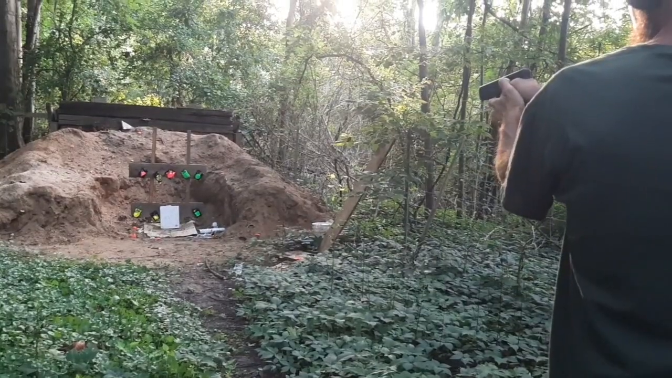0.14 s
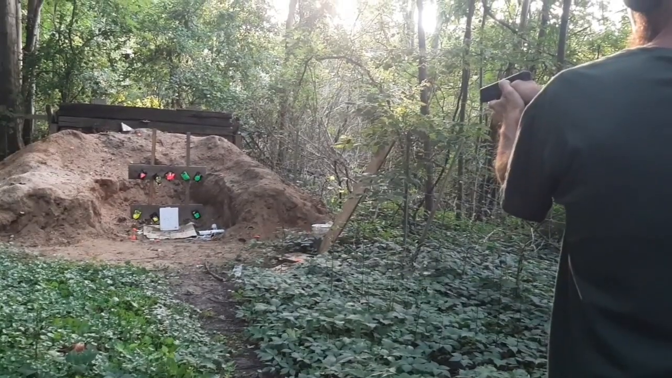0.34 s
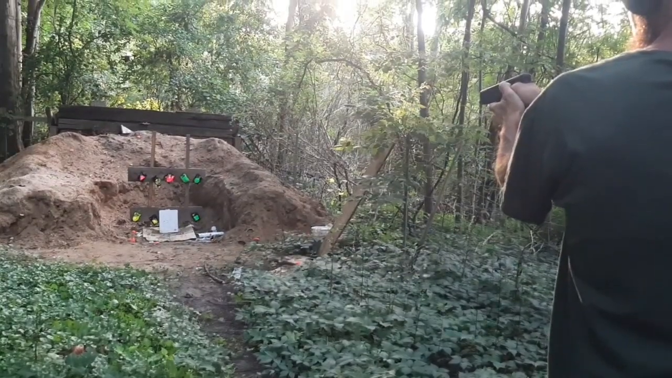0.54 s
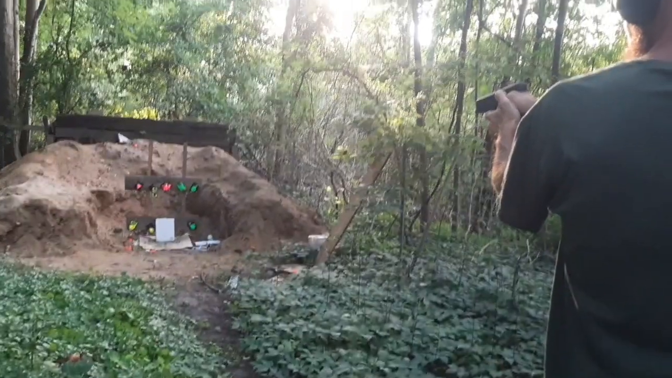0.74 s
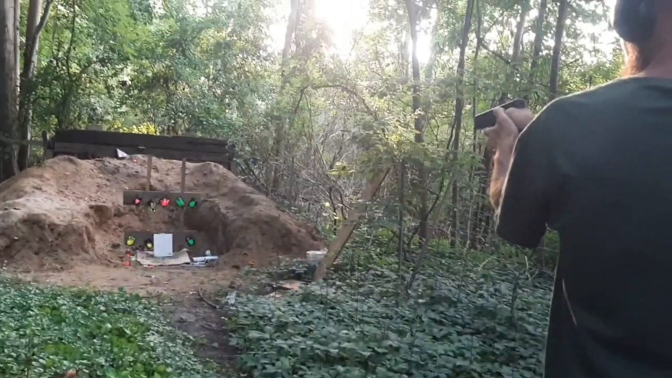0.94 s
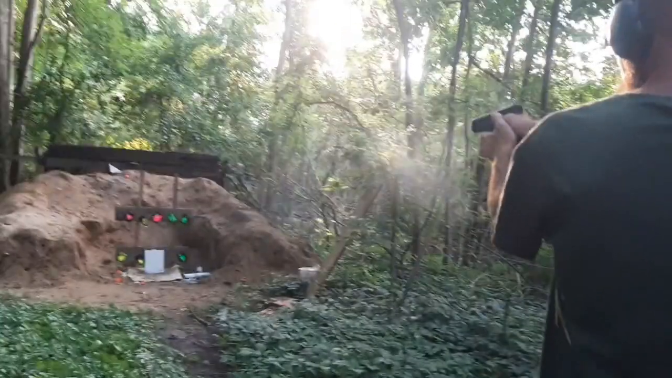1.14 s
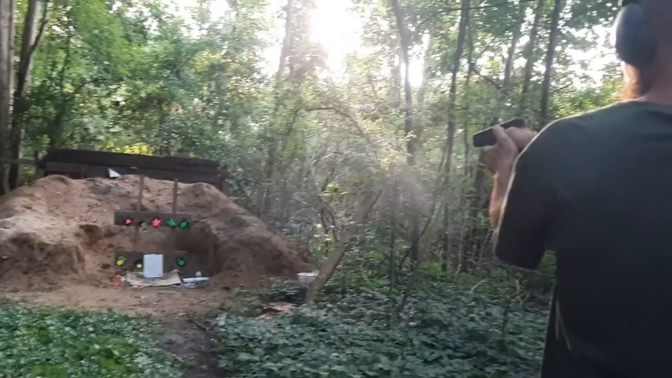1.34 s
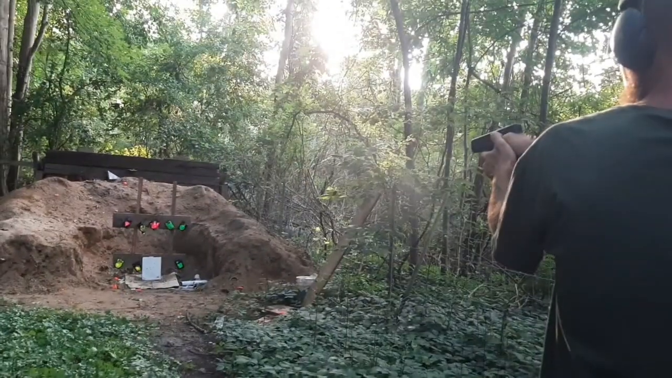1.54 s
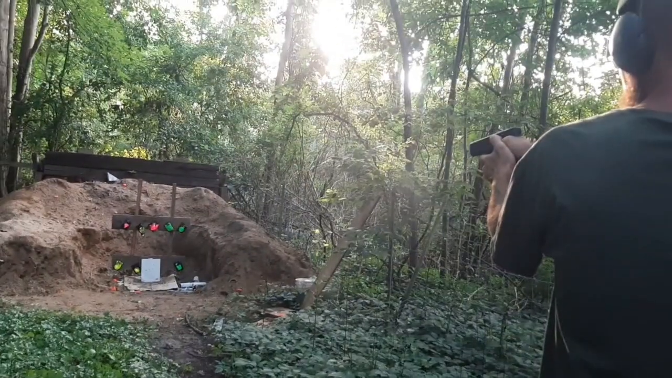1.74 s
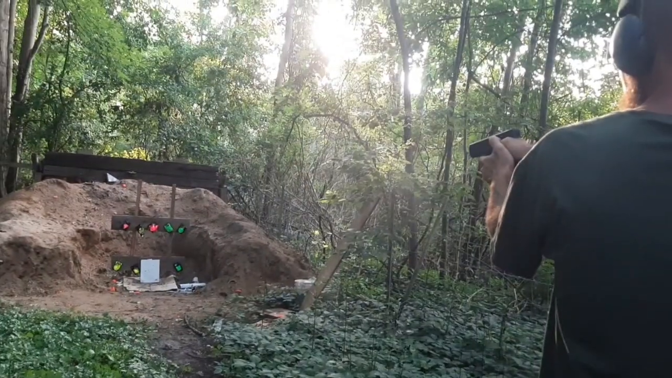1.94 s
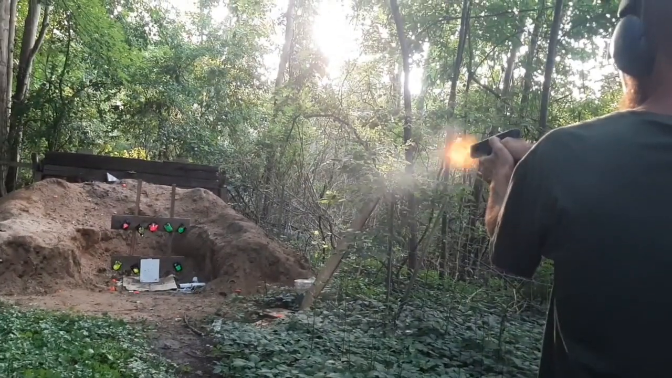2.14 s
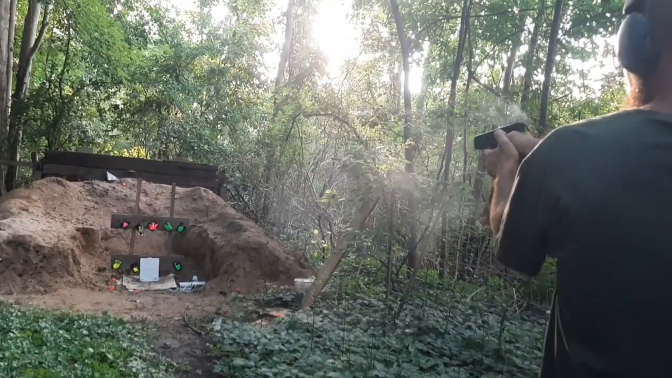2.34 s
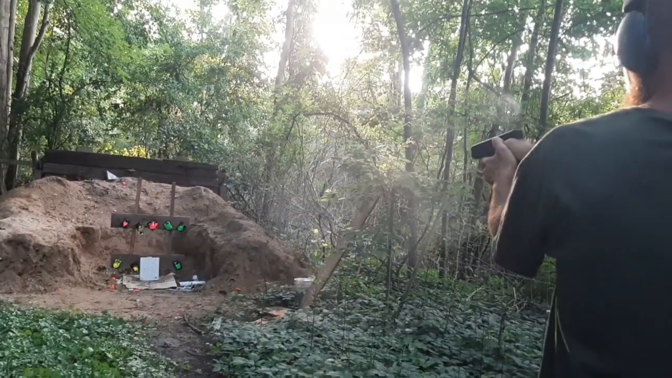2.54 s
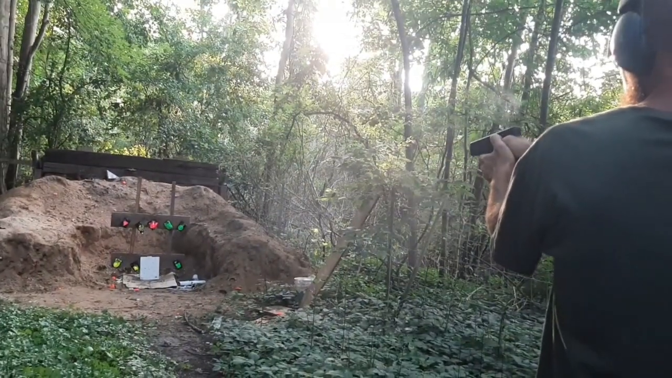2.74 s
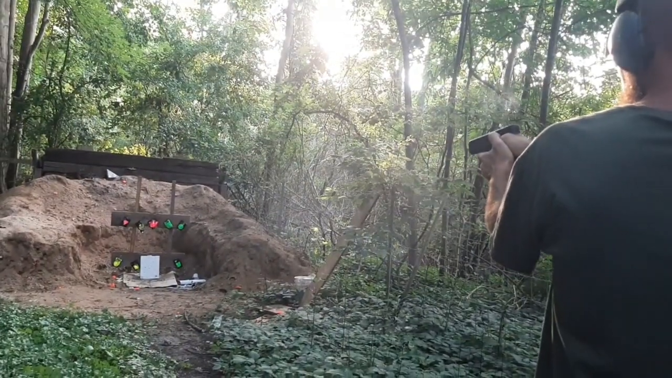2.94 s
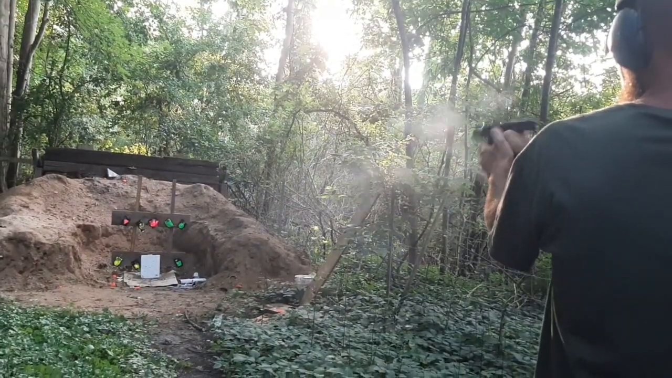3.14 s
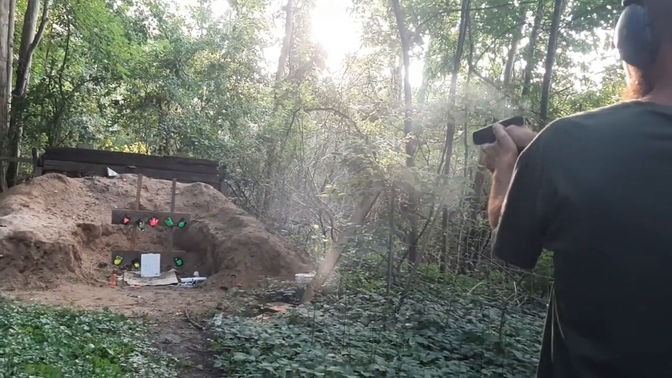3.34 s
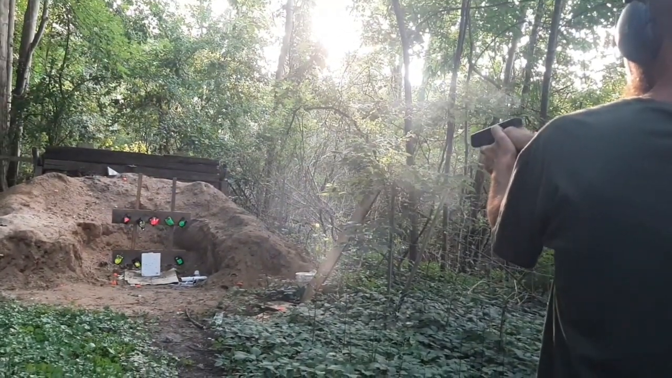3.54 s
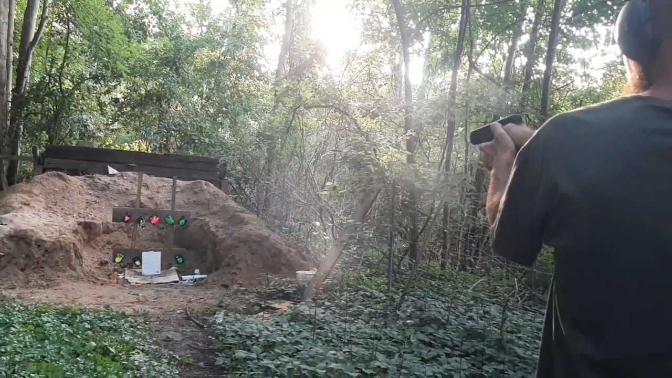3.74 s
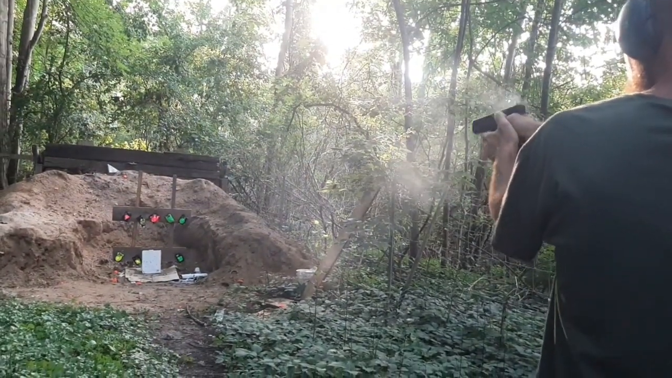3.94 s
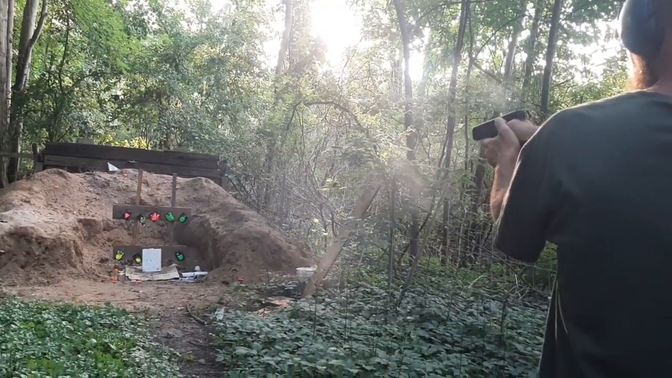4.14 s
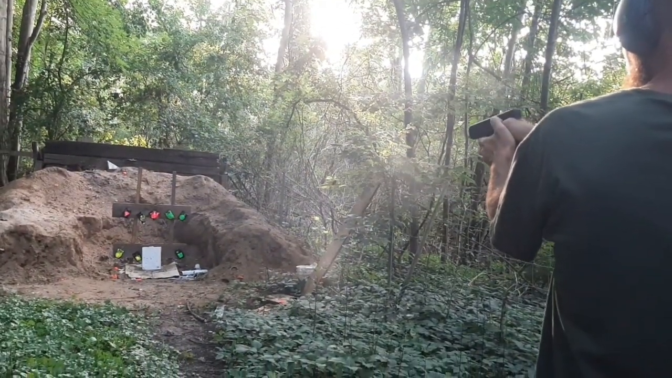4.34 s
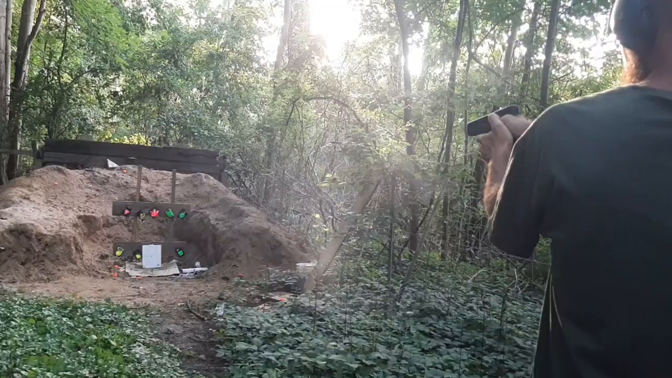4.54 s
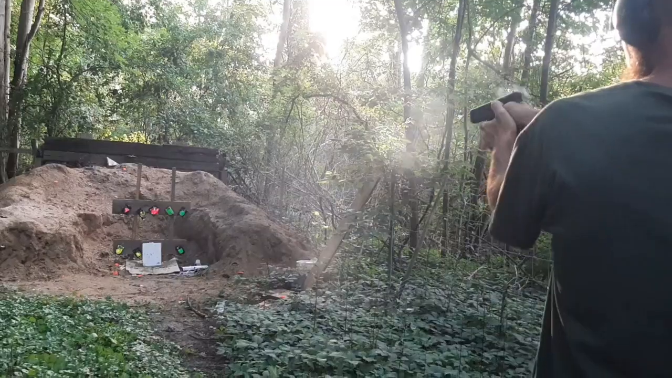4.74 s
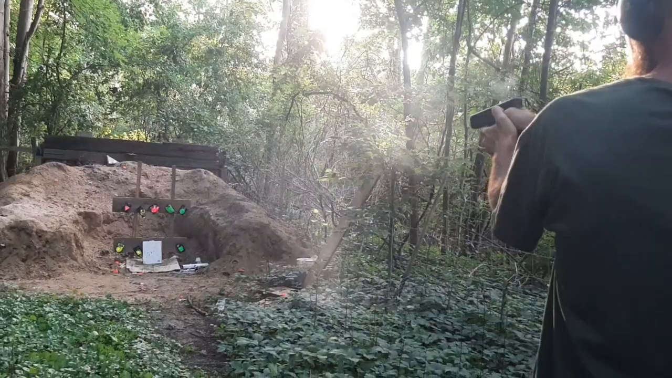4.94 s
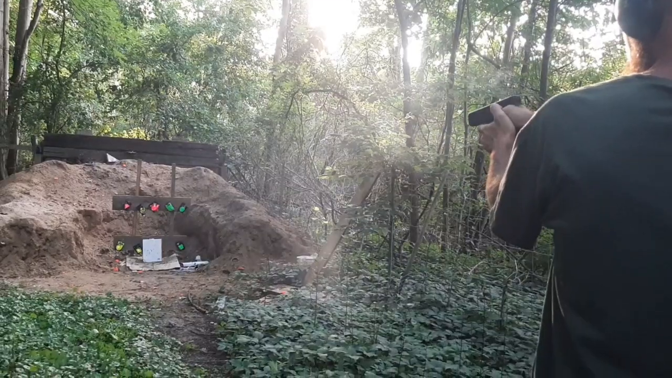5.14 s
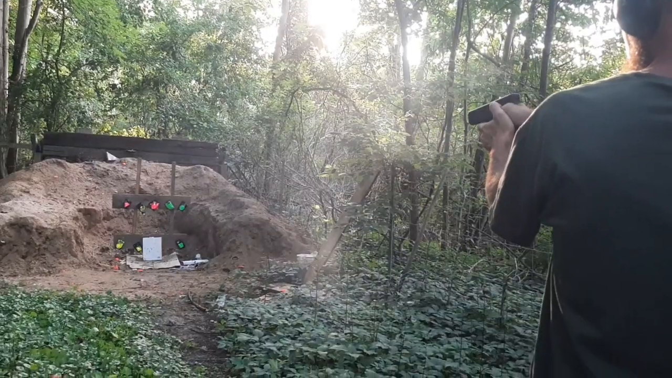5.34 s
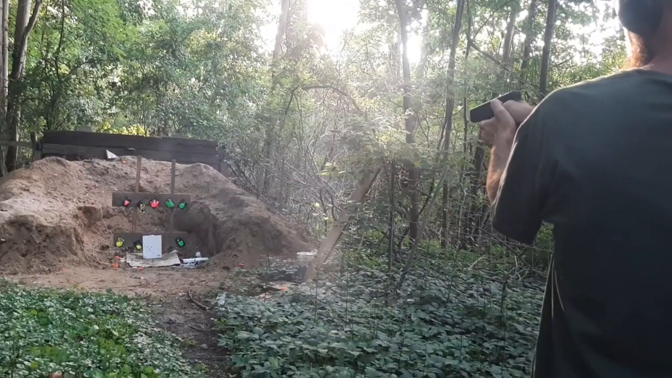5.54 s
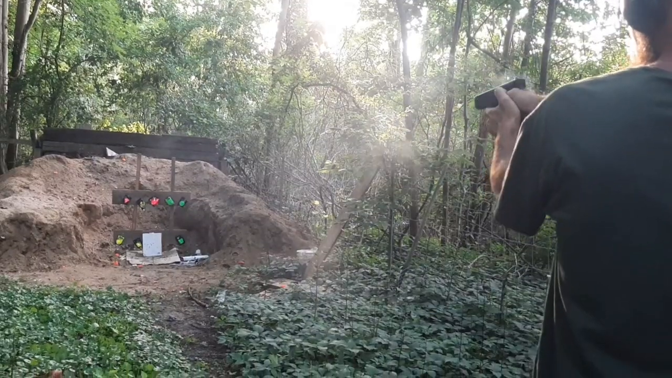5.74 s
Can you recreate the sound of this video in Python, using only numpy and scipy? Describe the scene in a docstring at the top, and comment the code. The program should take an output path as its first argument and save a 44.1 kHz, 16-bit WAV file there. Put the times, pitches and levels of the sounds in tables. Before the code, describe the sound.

Six loud pistol shots at a steady pace in a wood, each a clipped crack with a short rough echo among the trunks.

```python
"""A distant rumble with leaf hiss (banded noise) swells and flickers in a wood; a small tick comes first.
Six pistol shots follow, close to a phone behind the shooter's left shoulder: a direct blast each,
then sharp slaps, returns off an earth bank and noise scatter that dies away among the trunks.
The blasts overload the microphones and the gain control ducks the rumble, which creeps back after each.
Between shots, spent cases and twigs tick as short noise scratches, and brass rings as fading sines."""
import sys
import numpy as np
from scipy import signal
from scipy.fft import rfft, irfft, next_fast_len
from scipy.io import wavfile
from scipy.ndimage import uniform_filter1d

SR = 44100
rng = np.random.default_rng(int(sys.argv[2]) if len(sys.argv) > 2 else 0)


def dump_mix(stems):
    """Bounce the given channels to the path in sys.argv[1] as a 16-bit WAV at rate SR."""
    frames = np.atleast_2d(stems).T  # one column per channel
    limited = np.clip(frames, -1, 1)  # hard clip at full scale
    pcm = np.round(limited * 32767).astype(np.int16)
    wavfile.write(sys.argv[1], SR, pcm)


N = 254898

# Colour of distant traffic and leaves, relative: freq_hz, density_db (per Hz)
RUMBLE_COLOUR = [(25, -13), (66, -0.5), (130, -11), (230, -21.5), (476, -11.5), (620, -14), (920, -14.5),
                 (1350, -24.5), (2050, -21.5), (2500, -30.5), (4000, -39), (6700, -43.5), (7800, -54),
                 (9500, -66.5)]
# Stereo likeness of the rumble: freq_hz, likeness (0 to 1)
RUMBLE_LIKENESS = [(60, 0.99), (130, 0.94), (290, 0.96), (640, 0.3), (1400, 0), (15000, 0)]
# The rumble swells and sinks: time_s, level_db
RUMBLE_SWELL = [(0, 0.5), (1, -1.5), (1.6, 2.5), (2.1, -3), (2.8, 1.5), (4.3, -1.5), (5.3, 3.5)]
RUMBLE_DB = -26.5
FLICKER_DB, FLICKERS_PER_S = 2.74, 9.2
FLICKER_EVEN_HZ = 2500  # above this the hiss runs smoother

# Small ticks of spent cases and twigs: start_s, drive_db (before the band filter), decay_ms,
# centre_hz, left_minus_right_db
TICKS = [(0.792, -24, 2.5, 1500, 0), (1.751, -50, 5.5, 11500, 4), (1.988, -38, 9, 6500, 3),
         (2.885, -51, 12, 10900, 0), (3.007, -45, 8, 8500, 0), (5.35, -55, 12.6, 12000, -10)]
# Modes of the brass tube: freq_hz, level_db, t60_s
CASE_MODES = [(10600, -0.5, .2), (10680, -4, .16), (6300, -8.5, .5)]
# Landings that set the brass ringing: start_s, level_db,
# tilt_db (per octave below the first mode), left_minus_right_db
CASE_RINGS = [(1.751, -46, -4, 4), (1.988, -60, 14, 3)]

# Pistol shots, every round loaded alike: start_s
SHOT_TIMES = [1.0053, 2.139, 3.1154, 3.8558, 4.6378, 5.6236]
BLAST_DB = 7.5  # pulse, slaps and echo together
# Muzzle pulse: pressure jump, then suction
PUSH_S, PUSH_SHARE, SUCK_S, SUCK_SHARE = 0.00032, 0.6, 0.00045, 1
PULSE_DB = [[13.5], [-1.5]]  # left, right
# Single returns off close stems and ground
SLAPS_PER_S, SLAPS_FADE_S = 2200, 0.043
SLAPS_DB = [[12], [9]]  # left, right

# Colour of the scatter from the trunks, relative: freq_hz, density_db (per Hz)
WOOD_COLOUR = [(30, -16), (100, -10), (250, -10.5), (450, -4), (900, -1), (1550, -5.5), (2200, -3),
               (3200, -5.5), (5900, -3.5), (9000, -9), (15500, -10)]
# Fade of the scatter, before the extra air loss: freq_hz, t60_s
WOOD_T60 = [(60, 0.17), (250, 0.84), (500, 1.68), (1500, 1.32), (3000, 1.02), (6000, 0.88), (9000, 0.81),
            (14000, 0.29)]
# Stereo likeness of the scatter: freq_hz, likeness (-1 to 1)
WOOD_LIKENESS = [(60, 0.42), (130, -0.14), (290, 0.69), (640, 0.31), (1400, -0.13), (15000, 0.086)]
# Stronger parts of each shot: the direct blast (first two rows), then returns off bank and far trees:
# path_m, rise_s, fall_s, centre_hz, width_octaves, left_db, right_db (both over the scatter)
STRONG_PARTS = [(.34, 0.00055, 0.0026, 930, 1.72, 0.5, 12), (.34, .002, 0.024, 73, 1.43, 7.5, 20),
                (14.9, 0.01, 0.028, 680, 2, 0.5, 5), (24.3, 0.031, 0.029, 910, 1.47, 8, -1.5),
                (23.7, .02, 0.014, 87, 1.45, 18.5, 8), (85.5, 0.05, 0.041, 520, 0.87, -5, -1.5)]
# Late returns graze the ground, which thins one band and fills its neighbour:
# centre_hz, width_hz, share_added (-1 to 1)
GRAZING = [(1720, 420, -.65), (2123, 330, 0.52)]
GRAZING_GROWS_S = 0.22
WOOD_REPEATS = 0.78  # the trunks stand still: share of late scatter power that repeats at each shot
WOOD_HOLD_S, KNEE_S = 0.079, 0.012  # hold before the fade; softness of the bend between them
ONSET_S, SOUND_M_PER_S = 0.00027, 343
BUILD_S, BUILD_DB = 0.043, [[-7], [-3.5]]  # the scatter starts thin and fills in (left, right)
CLUMPS_DB, CLUMPS_PER_S = 1.5, 41.8  # trunks stand in groups, so the scatter comes in lumps
AIR_LOSS_PER_S_KHZ = 0.0057  # extra treble loss on long paths

# Colour that the phone's body lends to all sound: freq_hz, left_db, right_db
PHONE_BODY = [(30, -11, -10), (45, 0.5, 0), (250, 0.5, -2), (695, -4, -5), (1150, -2.5, -1),
              (1580, 1.5, -3.5), (1720, -3, -3.5), (2070, 0.5, -2), (2120, 1, -3.5), (2500, -3.5, -1.5),
              (2820, -2.5, -1), (4560, -2.5, 1.5), (7500, 4, 1), (10000, 2, 0.5)]
PORT_HZ, PORT_WIDTH_HZ, PORT_DEPTH = 8570, 2150, 0.77  # notch of the microphone port, depth 0-1
GAIN_THRESHOLD_DB, GAIN_RANGE_DB, GAIN_RISE_DB_PER_S = -19, 19, 3  # range is the deepest cut
TOP_HZ = 15700


def undb(db):
    """Amplitude factor for a level in dB."""
    return 10 ** (np.asarray(db) / 20)


def read(table, hz):
    """Table value at each frequency, straight on a log axis."""
    table_hz, values = np.transpose(table)
    return np.interp(np.log(np.maximum(hz, 1)), np.log(table_hz), values)


def stereo_spectra(white, colour, likeness):
    """Left and right spectra of coloured noise, mixed from two white noises used as mid and side."""
    size = white.shape[-1]
    hz = np.arange(size // 2 + 1) * SR / size
    alike = np.clip(read(likeness, hz), -1, 1)
    mid = rfft(white[0]) * np.sqrt((1 + alike) / 2)
    side = rfft(white[1]) * np.sqrt((1 - alike) / 2)
    gain = undb(read(colour, hz))
    gain = gain / np.sqrt(np.mean(gain ** 2))  # keeps the rms at 1
    return np.array([mid + side, mid - side]) * gain, hz


def bands(spectra, hz, size):
    """Overlapping bands, half an octave apart from 32 Hz to 16 kHz, that crossfade into each other."""
    place = 2 * np.log2(np.maximum(hz, 1) / 32)
    for k in range(19):
        weight = np.clip(1 - abs(place - k), 0, 1)
        yield 2 ** (5 + k / 2), irfft(spectra * weight, size)


def walk(rate):
    """Random levels held 1 / rate s and smoothed twice; spread near 1."""
    hold = int(SR / rate)
    steps = np.repeat(rng.standard_normal(2000), hold)[:N]
    return 1.3 * uniform_filter1d(uniform_filter1d(steps, hold), hold)


def panned(level_db, left_minus_right_db):
    """Left and right amplitudes for a level and a level difference."""
    return undb([[level_db + left_minus_right_db / 2], [level_db - left_minus_right_db / 2]])


def rumble():
    """Distant rumble and leaves: noise whose bands swell together and flicker alone."""
    size = next_fast_len(N)
    white = rng.standard_normal((2, size))
    spectra, hz = stereo_spectra(white, RUMBLE_COLOUR, RUMBLE_LIKENESS)
    swell_db = np.interp(np.arange(N) / SR, *np.transpose(RUMBLE_SWELL))
    out = np.zeros((2, N))
    for centre_hz, band in bands(spectra, hz, size):
        depth_db = FLICKER_DB * min(1, FLICKER_EVEN_HZ / centre_hz)
        out += band[:, :N] * undb(swell_db + depth_db * walk(FLICKERS_PER_S))
    return undb(RUMBLE_DB) * out


def ticks():
    """Landings as band-filtered noise scratches of a few ms; some brass rings on in decaying modes."""
    t = np.arange(8000) / SR
    out = np.zeros((2, N + len(t)))
    noises = rng.standard_normal((len(TICKS), len(t)))
    for (start_s, drive_db, decay_ms, centre_hz, pan_db), noise in zip(TICKS, noises):
        peak = signal.iirpeak(centre_hz, 0.7, SR)
        burst = noise * np.exp(-1e3 * t / decay_ms)
        scratch = signal.lfilter(*peak, signal.lfilter(*peak, burst))
        out[:, int(start_s * SR):][:, :len(t)] += scratch * panned(drive_db, pan_db)
    for start_s, ring_db, tilt_db, pan_db in CASE_RINGS:
        ring = 0
        for hz, mode_db, t60 in CASE_MODES:
            level_db = mode_db + tilt_db * np.log2(CASE_MODES[0][0] / hz)
            ring = ring + undb(level_db - 60 * t / t60) * np.sin(2 * np.pi * hz * t)
        out[:, int(start_s * SR):][:, :len(t)] += ring * panned(ring_db, pan_db)
    return out[:, :N]


def shot_envelope(hz, t):
    """Amplitude of a shot: scatter that holds and then fades, plus the direct blast and strong returns."""
    late = KNEE_S * np.logaddexp(0, (t - WOOD_HOLD_S) / KNEE_S)
    # longer paths lose ever more treble to air and leaves
    late = late * (1 + AIR_LOSS_PER_S_KHZ * late * hz / 1e3)
    build = undb(2 * np.multiply(BUILD_DB, np.exp(-t / BUILD_S)))
    power = build * undb(-120 * late / read(WOOD_T60, hz))
    for path_m, rise_s, fall_s, centre_hz, octaves, left_db, right_db in STRONG_PARTS:
        since = t - path_m / SOUND_M_PER_S
        hump = np.where(since < 0, np.exp(-(since / rise_s) ** 2), np.exp(-abs(since) / fall_s))
        share = np.exp(-(np.log2(hz / centre_hz) / octaves) ** 2)
        power = power + share * hump * undb([[left_db], [right_db]]) ** 2
    return np.sqrt(power) * np.clip(t / ONSET_S, 0, 1)


def blast_and_echo(t):
    """Noise of blast and scatter: same trunks, through air and from a stance that change a little."""
    size = len(t)
    repeated = rng.standard_normal((2, 1, size))
    fresh = rng.standard_normal((2, len(SHOT_TIMES), size))
    same = WOOD_REPEATS * np.clip(t / 0.048, 0.4, 1)  # the early part repeats less
    white = np.sqrt(same) * repeated + np.sqrt(1 - same) * fresh
    spectra, hz = stereo_spectra(white, WOOD_COLOUR, WOOD_LIKENESS)
    echo = 0
    for centre_hz, band in bands(spectra, hz, size):
        clumps = undb(CLUMPS_DB * walk(CLUMPS_PER_S)[:size])
        echo = echo + band * (shot_envelope(centre_hz, t) * clumps)[:, None]
    grazing = 0
    for centre_hz, width_hz, share in GRAZING:
        peak = signal.iirpeak(centre_hz, centre_hz / width_hz, SR)
        grazing = grazing + share * signal.lfilter(*peak, echo)
    return echo + (1 - np.exp(-(t / GRAZING_GROWS_S) ** 2)) * grazing


def slaps(t):
    """Near surfaces each send back one sharp pressure spike, at random moments in a fading shower."""
    happens, strength = rng.random((2, 2, len(SHOT_TIMES), len(t)))
    hits = (happens < SLAPS_PER_S / SR) * strength * np.exp(-t / SLAPS_FADE_S)
    short = t[:60]
    spike = np.exp(-(short / 0.00009 - 1.5) ** 2) - 0.16 * np.exp(-short / 0.00038)
    return undb(SLAPS_DB)[:, :, None] * signal.lfilter(spike, 1, hits)


def muzzle_pulse(t):
    """Pressure jump at the muzzle, then the suction that follows it."""
    push = PUSH_SHARE * np.exp(-t / PUSH_S)
    suck = SUCK_SHARE * (t / SUCK_S) * np.exp(-t / SUCK_S)
    return undb(PULSE_DB) * (push - suck)


def shots():
    """Each shot is the muzzle pulse with its blast noise, its slaps and its echo from the wood."""
    size = 54000
    t = np.arange(size) / SR
    echo = blast_and_echo(t) + slaps(t)
    pulse = muzzle_pulse(t)
    out = np.zeros((2, N + size))
    for k, start_s in enumerate(SHOT_TIMES):
        i = int(start_s * SR)
        out[:, i:i + size] += undb(BLAST_DB) * (echo[:, k] + pulse)
    return out[:, :N]


def scene():
    """Rumble, ticks and shots together, as they reach the phone."""
    return rumble() + ticks() + shots()


def phone_colour(x):
    """The body tints each side and the microphone port cuts a partial notch."""
    hz = np.linspace(0, SR / 2, 2049)
    body = []
    for column in (1, 2):
        gain = undb(read(np.array(PHONE_BODY)[:, [0, column]], hz))
        body.append(signal.firwin2(2047, hz, gain, fs=SR))
    x = signal.oaconvolve(x, body, "same", axes=1)
    notch = signal.iirnotch(PORT_HZ, PORT_HZ / PORT_WIDTH_HZ, SR)
    return x + PORT_DEPTH * (signal.lfilter(*notch, x) - x)


def gain_control(x):
    """Gain shared by both sides that drops at once on loud sound and creeps back at a steady rate."""
    power = uniform_filter1d(np.mean(x ** 2, axis=0), size=88)  # 2 ms window
    loud_db = 10 * np.log10(power + 1e-12)
    want_db = -np.clip(loud_db - GAIN_THRESHOLD_DB, 0, GAIN_RANGE_DB)
    creep_db = GAIN_RISE_DB_PER_S * np.arange(N) / SR
    return x * undb(np.minimum.accumulate(want_db - creep_db) + creep_db)


def overload(x):
    """Soft clipping; the left capsule flattens suction sooner than pressure."""
    limit = np.where(x > 0, [[1.3], [1.1]], [[0.6], [1.1]])
    return limit * np.tanh(x / limit)


def record(dry):
    """Phone colour, gain control and overload, then cut bass and top."""
    x = overload(gain_control(phone_colour(dry)))
    x = signal.sosfilt(signal.butter(3, 36, "high", fs=SR, output="sos"), x)
    x = signal.sosfilt(signal.ellip(10, 0.2, 70, TOP_HZ, fs=SR, output="sos"), x)
    return np.clip(x, -1, 1)


dry = scene()
out = record(dry)
dump_mix(out)
```